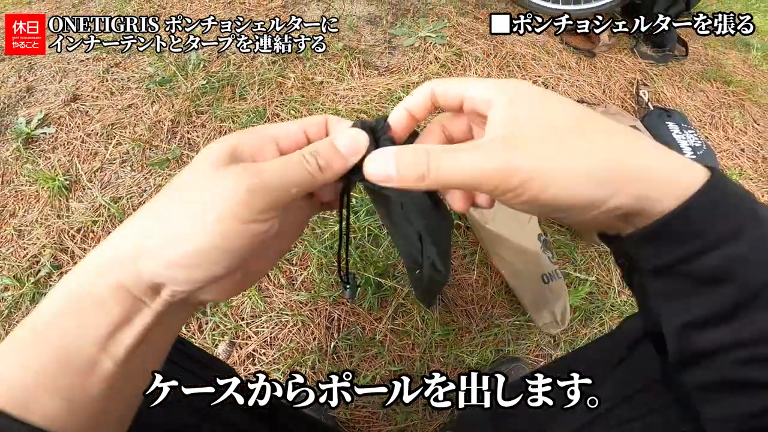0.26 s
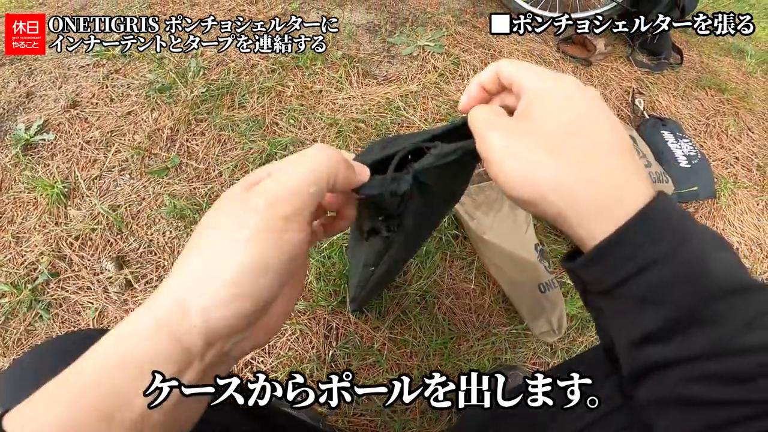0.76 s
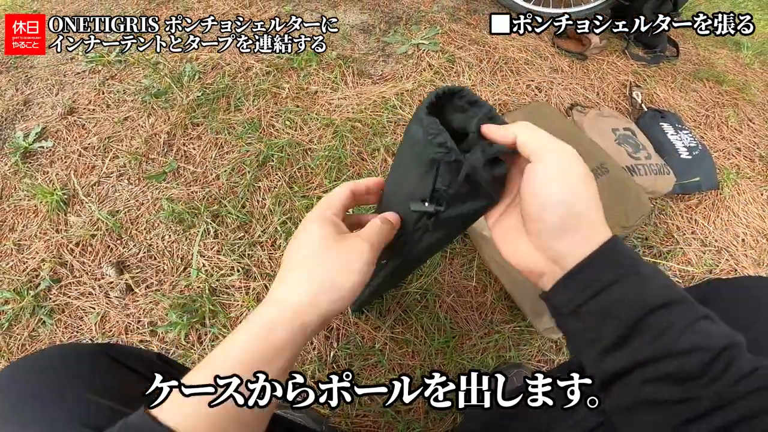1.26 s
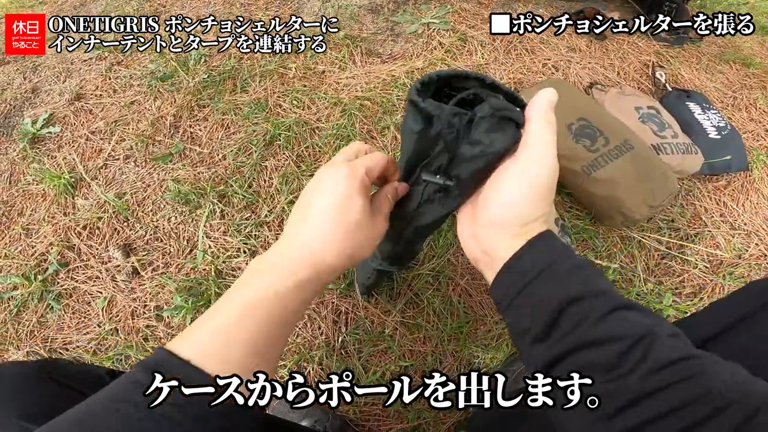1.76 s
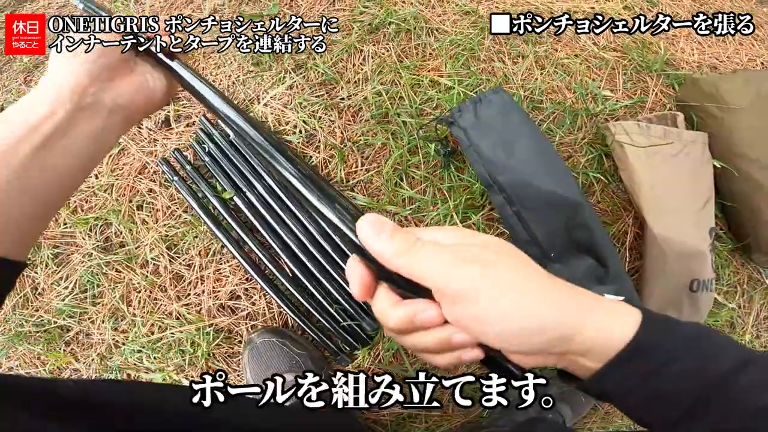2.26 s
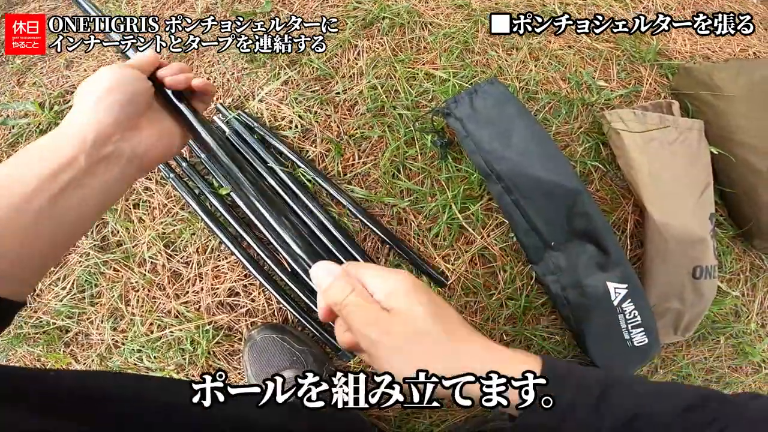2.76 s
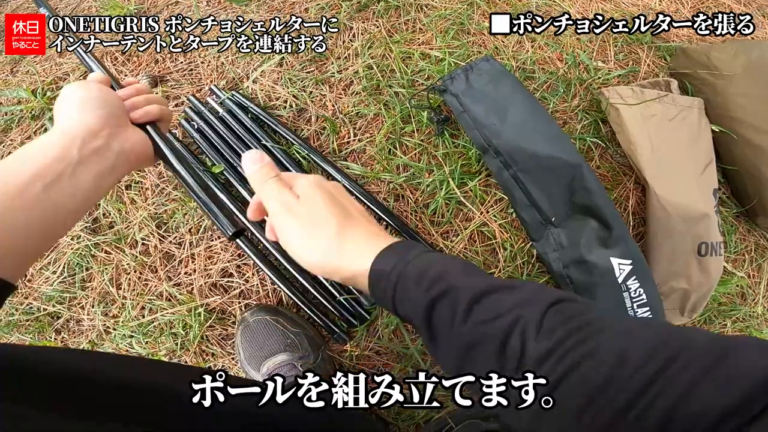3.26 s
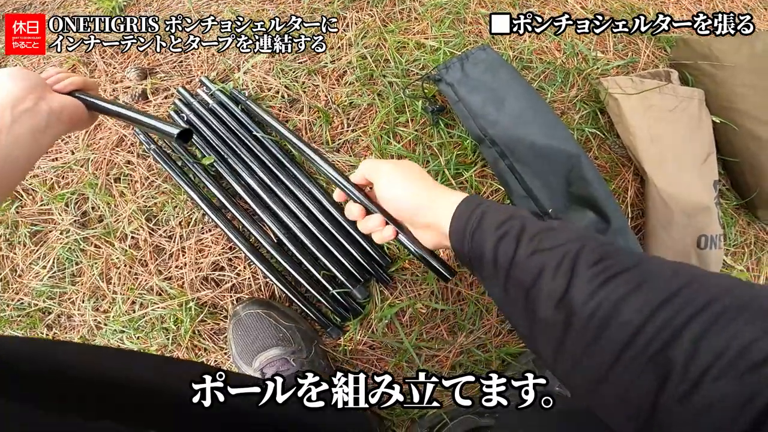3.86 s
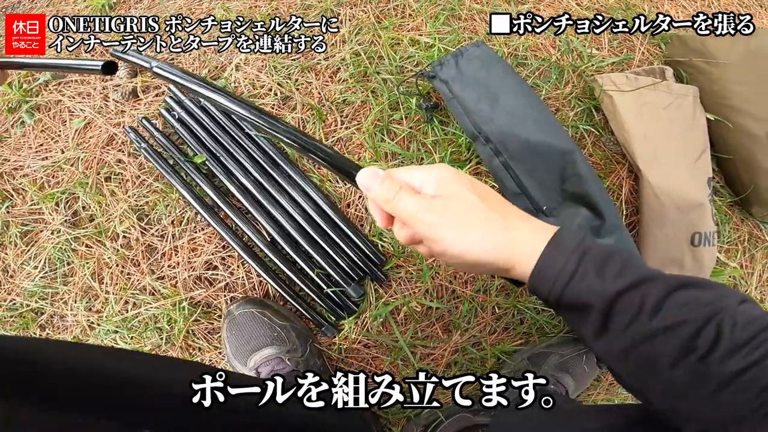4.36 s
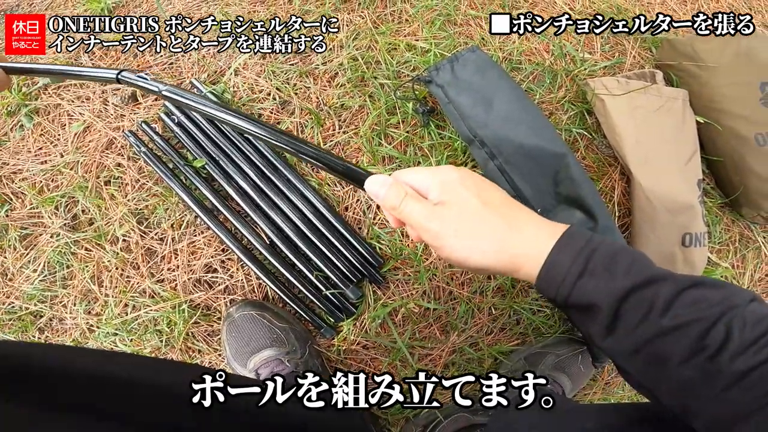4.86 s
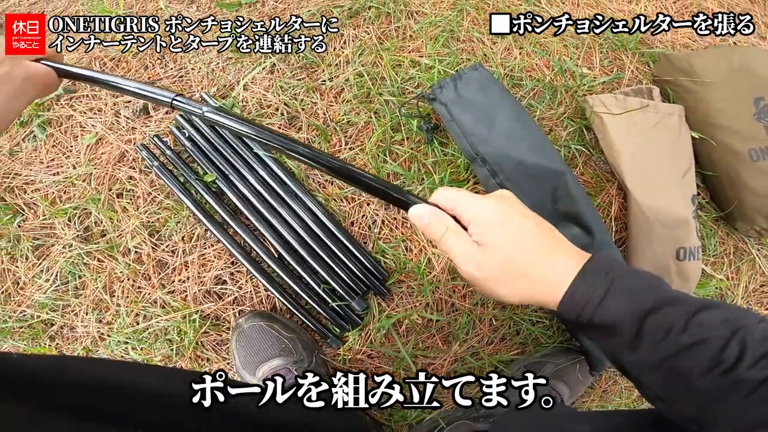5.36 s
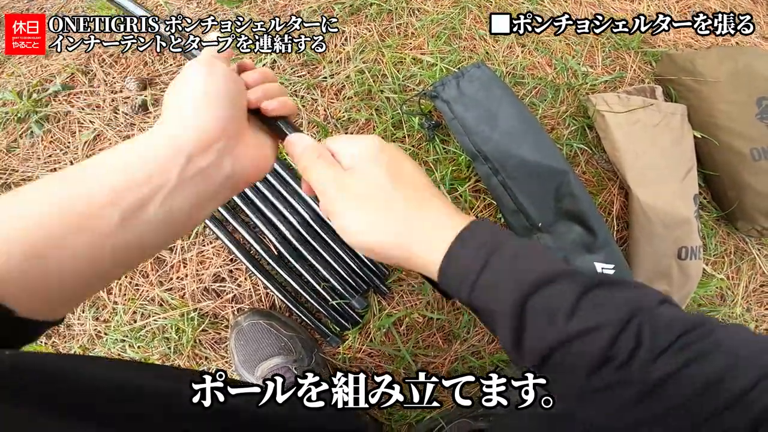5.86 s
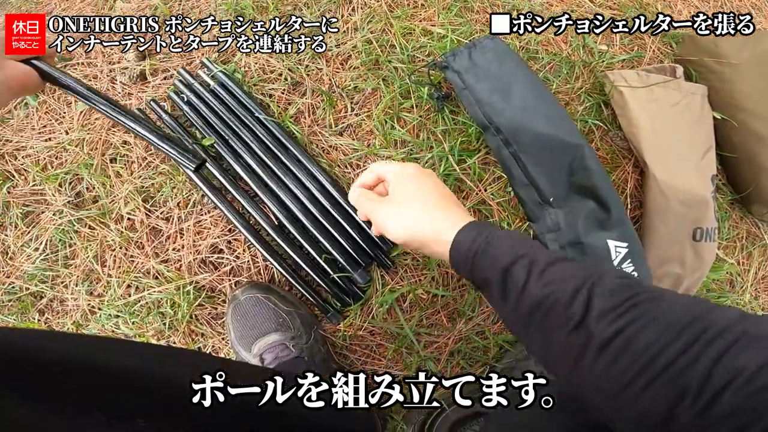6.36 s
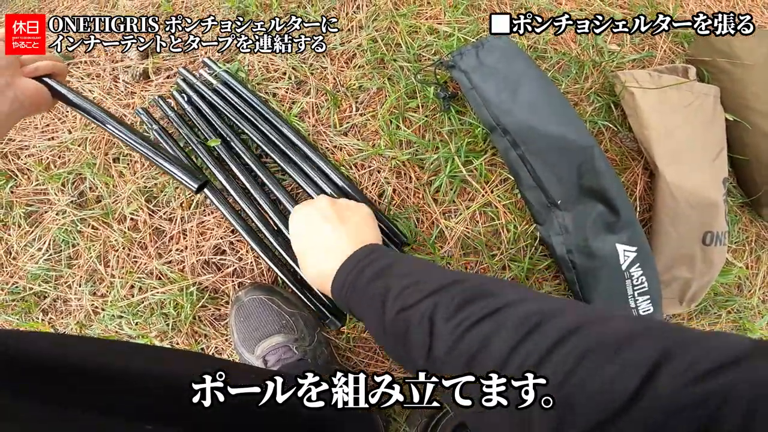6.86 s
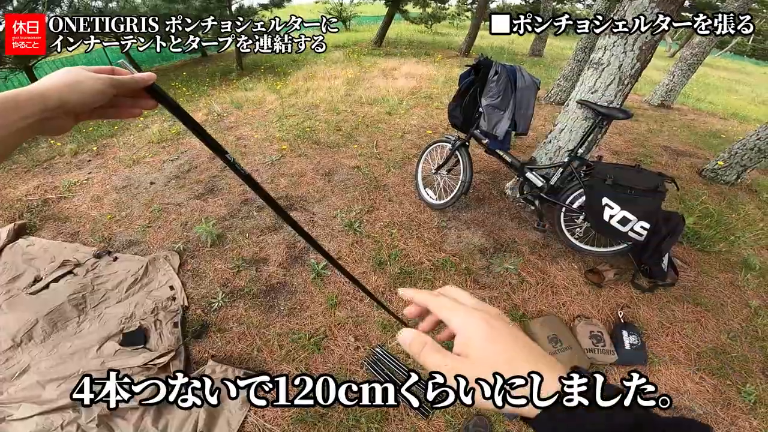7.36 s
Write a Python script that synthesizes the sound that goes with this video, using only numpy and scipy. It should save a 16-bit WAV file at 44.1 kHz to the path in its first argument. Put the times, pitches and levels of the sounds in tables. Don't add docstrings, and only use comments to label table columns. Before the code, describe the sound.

Close, bright clinking of hollow pole sections in a cloth bag, two crisp joint connections amid chirping birds, a heap rattle, then an engine passing.

```python
import sys
import numpy as np
from scipy import signal
from scipy.fft import rfft, irfft, next_fast_len
from scipy.io import wavfile
from scipy.ndimage import uniform_filter1d, map_coordinates

SR = 44100
rng = np.random.default_rng(int(sys.argv[2]) if len(sys.argv) > 2 else 0)


def undo_db(level):
    steps = np.asarray(level, float) / 20
    return 10 ** steps


def waveform_to_disk(signal):
    frames = np.transpose(np.atleast_2d(signal))
    scaled = np.clip(frames, -1, 1) * 32767
    samples = np.round(scaled).astype(np.int16)
    wavfile.write(sys.argv[1], SR, samples)


N = 335601

# start_s, fade_in_s, cut_s
SHOTS = [
    (0, .002, 2.1405),
    (2.335, .09, 7.1225),
    (7.318, .09, 7.7),
]
HEAP_SHOT_S, ENGINE_SHOT_S = SHOTS[1][0], SHOTS[2][0]


def unit(x):
    return x / np.sqrt(np.mean(x ** 2) + 1e-20)


def along(points, hz):
    f, v = np.transpose(points)
    return np.interp(np.log(hz + 1), np.log(f + 1), v)


def wobble(rate):
    knots = rng.standard_normal(int(N * rate / SR) + 4)
    return map_coordinates(knots, [np.arange(N) * rate / SR])


def filtered(x, response):
    m = next_fast_len(N + 8192)
    return irfft(rfft(x, m) * response(np.fft.rfftfreq(m, 1 / SR)), m)[..., :N]


def resonate(x, hz, width_hz):
    pole = np.exp((2j * hz - abs(width_hz)) * np.pi / SR)
    wave = signal.lfilter([1], [1, -pole], x)
    return wave / np.abs(wave).max()


def grit(count, spike):
    strength = np.exp(spike * rng.standard_normal(count // 24 + 1))
    return unit(rng.standard_normal(count) * strength.repeat(24)[:count])


def add(track, s, sound):
    i = round(s * SR)
    track[..., i:i + sound.shape[-1]] += sound[..., :track.shape[-1] - i]


def by_shot(tables):
    t = np.arange(N) / SR
    shot = np.searchsorted([start for start, *_ in SHOTS], t, side="right") - 1
    curves = []
    for k in range(1, len(tables[0][0])):
        each = [np.interp(t, np.array(rows)[:, 0], np.array(rows)[:, k]) for rows in tables]
        curves.append(np.choose(shot, each))
    return curves


# frequency_hz, width_hz, level_db
TUBE = [(670, 37, -31), (1839.3, 44, -6.5), (2500, 49, -17), (3506, 58, -8.5), (4100, 130, -19.5),
        (4800, 66, -26.5), (5502, 59, -12), (6600, 120, -30), (6840, 27, -21), (7740, 31, -22),
        (8240, 32, -25), (9160, 33, -28.5), (10320, 76, -29.5), (12070, 110, -30.5)]
# frequency_hz, level_db (per Hz)
RATTLE = [(300, -41.5), (1000, -8), (2000, 2.5), (3600, -5.5), (6000, -12), (9000, -13), (15500, -43)]


def clatter():
    out, edge = np.zeros((2, N)), np.zeros(N)
    for s, db, *strengths in knocks():
        in_bag = s < HEAP_SHOT_S
        t = np.arange(SR // 12 if in_bag else SR // 6) / SR
        decay = undo_db(-60 * (t / (.036 if in_bag else .09)) ** 1.11)
        chatter = grit(len(t), 0.69) * decay * (1 - np.exp(-t / 0.0026))
        blow = chatter + 9 * (np.arange(len(t)) == 4)

        highest = strengths[-1] / 2 + (0 if in_bag else -7)
        levels = np.add(strengths + [highest], [1.3, 12, 5.1, 5, 4.3])
        struck = list(zip([1680, 2360, 3285, 6000, 12000], levels))
        struck.insert(3, (4190, levels[2] + (1 if in_bag else -12)))

        damping = (1.6 if s > 1.8 else .8) if in_bag else .3
        apart = .018 if in_bag else .006
        for hz, width, level in TUBE:
            detune, split, vary, place, sign = rng.standard_normal(5)
            pair = resonate(blow, hz * (1 + 0.0048 * detune), damping * width)
            pair += .7 * resonate(chatter, hz * (1 + apart * split), 1.5 * damping * width)
            if hz < 6000:
                pair += undo_db(-10.5) * resonate(blow, hz * (1 - apart / 3 * split), .35 * damping * width)
            spread_db = 1.2 if hz < 4000 else 3.5
            pair *= undo_db(db + level + along(struck, hz) + spread_db * vary) * np.sign(sign)
            side = 0.24 * (hz / 3000) ** .45 * place * pair.real
            add(out, s, np.array([pair.imag, side]))

        crack = undo_db(db - 8.5 - 60 * t / 0.0064) * rng.standard_normal(len(t))
        add(edge, s, undo_db(db - 9.0) * chatter + crack)
    middle = out[0] + filtered(edge, lambda f: undo_db(along(RATTLE, f)))
    return np.array([middle + out[1], middle - out[1]])


# start_s, peak_db, lean_db (from the 1.8 to the 3.5 kHz mode), middle_db (2.5 kHz mode)
BAG = [(0.065, -33, 2.5, -5.5), (0.076, -20.5, 2.5, -20), (0.0919, -21.5, 0.5, -10),
       (0.1047, -15.5, -0.5, -11.5), (0.2131, -32, -9.5, -32.5), (0.2934, -34, 3.5, -14),
       (0.3232, -21, 1, -21), (0.499, -20, 1, -17.5), (0.604, -30.5, 1.5, -17.5), (0.684, -12.5, -7, -10.5),
       (0.6916, -11, 7, -11), (0.7059, -12, 0.5, -11), (0.72, -20.5, -3, -13), (0.7766, -38.5, -3, -17.5),
       (0.7887, -14, -5.5, -24), (.799, -17, -1, -15), (0.815, -21, 3.5, -21), (0.8311, -7, -1, -28.5),
       (.841, -12, 2, -21.5), (0.8504, -11, 3, -24.5), (0.8776, -16, -1, -14), (0.9541, -12.5, 1, -11.5),
       (.974, -23.5, -3.5, -23.5), (1.026, -23, 3, -23), (1.0666, -22, -0.5, -12), (1.0816, -16, 1.5, -9),
       (1.099, -22, 3, -10), (1.3554, -18, 1, -30), (1.36, -26, -4.5, -14.5), (1.4597, -17, 0, -16),
       (1.481, -11, 2, -24), (1.4875, -10.5, 2.5, -23.5), (1.543, -22, 4, -17.5), (1.5487, -14.5, 4, -11),
       (1.5593, -14, 7, -20), (1.5719, -7.5, 2, -18), (1.576, -12.5, 0.5, -14), (1.583, -11.5, -0.5, -15.5),
       (1.5904, -15.5, 4, -22.5), (1.86, -11, 8, -25), (1.8744, -12, 7.5, -20), (1.8831, -4, 2, -25)]
# (modes near 1.8, 3.5 and 5.5 kHz)
HEAP = [(2.811, -41, -19, -6, -36), (3.5796, -48, -26, -23, -7.5), (3.652, -42, -31, -12, 1.5),
        (3.6684, -38.5, -15, -25, -12), (3.764, -32, -26, -21, -16), (3.7884, -30, -16, -36, -16),
        (3.817, -41, -26, -26, -17), (6.706, -47.5, 0, -15, -18.5), (6.732, -45.5, -2, -10, -14),
        (6.7229, -35.5, 1, -18, -9), (6.758, -39, -1, -23, -12.5), (6.8717, -27, -4, -13, -7.5),
        (6.8995, -29.5, -3, -16, -33), (6.9188, -29.5, -6, -13, -14), (6.803, -47, -7, -18, -12),
        (6.937, -29, -5, -21, -17), (6.946, -32.5, -8, -30, -16), (7.03, -46, -7, -21, -10),
        (7.0681, -38, -3, -18.5, -22.5), (7.0103, -40.5, 1, -31, -5), (7.0821, -25, -32, -7.5, -21),
        (7.089, -16.5, -13.5, -1, -9.5), (7.1065, -15, -8.5, -6.5, -18), (7.1153, -19.5, -19.5, -0.5, -17)]


def knocks():
    rows = []
    for s, db, lean, middle in BAG:
        top = -24 + .4 * (db + 14.0)
        rows.append((s, db, -9 - lean, middle, -10 + lean, top))

    free = np.diff([row[0] for row in rows] + [np.inf]) > .03
    rebounds = [(s + 0.0062, db - 15.5, *np.add(modes, 6.5))
                for (s, db, *modes), alone in zip(rows, free) if alone]

    heap = [(s, db, low, -29, main, top) for s, db, low, main, top in HEAP]
    return rows + rebounds + heap


# start_s, peak_db, pitch_hz (strongest mode),
# brightness_db
TICKS = [(.916, -15, 1173, -30.5), (0.939, -12.5, 1530, -39), (1.465, -19, 3950, -35),
         (1.609, -18.5, 4110, -30.5), (1.6299, -10, 1430, -35), (2.805, -31, 5550, -32),
         (3.785, -50, 2300, -15), (4.642, -53, 6860, -19), (5.034, -32.5, 3450, -50),
         (5.2464, -34, 3480, -40), (5.577, -19, 3880, -45), (5.778, -40, 4200, -33.5),
         (1.2281, -34, 3910, -25.5), (1.4186, -30.5, 3840, -32.5), (1.673, -18, 1500, -31),
         (1.8076, -21.5, 1129, -38), (1.93, -14.5, 3640, -29.5), (2.3781, -17, 1810, -27),
         (2.386, -4.5, 2550, -32), (2.3909, 0, 3110, -36.5), (2.677, -10, 3870, -40),
         (2.6845, -4.5, 5330, -43.5), (4.8743, -17.5, 1600, -47), (4.9988, -35, 3460, -43),
         (5.0188, -20, 3420, -29), (5.017, -18.5, 1130, -48), (5.0572, -29.5, 3500, -25),
         (5.2214, -27.5, 2760, -49), (5.2413, -24, 7300, -17), (5.2556, -5.5, 3330, -18.5),
         (5.3141, -18.5, 2630, -60), (5.5475, -26, 5100, -26), (5.5684, -18, 4750, -26),
         (5.6367, -15.5, 3460, -12.5), (5.6392, -4, 3600, -24.5), (6.034, -35, 3430, -33.5),
         (.2658, -33, 1830, -33), (0.3709, -23.5, 1750, -29), (0.4308, -25.5, 1750, -31),
         (.5826, -22.5, 1200, -32.5), (.643, -22, 900, -40), (0.6864, -12, 4300, -30.5),
         (1.0251, -22.5, 1500, -24.5), (1.1648, -30, 1900, -33), (1.2855, -32, 1902, -31),
         (2.0328, -24, 1210, -33), (2.1326, -17.5, 1110, -35), (5.757, -53, 3300, -35),
         (7.0889, -16.5, 1520, -27), (6.792, -27, 1830, -26.5)]
# frequency_hz, width_hz, level_db
GRIPPED = [(1590, 100, -3.5), (2790, 130, -9.5), (3450, 250, -4.5), (4000, 190, -11.5), (4870, 150, -14),
           (5800, 250, -11), (7300, 160, -18)]


def ticks():
    raw, bright = np.zeros((2, N))
    t = np.arange(SR // 12) / SR
    for s, db, hz, bright_db in TICKS:
        decay = undo_db(-60 * t / .012) + .04 * undo_db(-60 * t / .09)
        crack = grit(len(t), .3) * decay * (1 - np.exp(-t / 0.0011))
        body = resonate(crack, hz, 380).imag
        for f, width, level in GRIPPED:
            body = body + undo_db(level - 8.0 + 0.68 * rng.normal()) * resonate(crack, f, width).imag
        add(raw, s, undo_db(db) * (0.11 * crack + body))
        add(bright, s, undo_db(db + bright_db + 8.0) * crack)
    return contact(raw, bright)


# start_s, seated_s, level_db, whistle_db, ring_db
SLIDES = [
    (2.352, 2.394, -31, -10.5, -49),
    (2.639, 2.688, -26, -10.5, -16),
    (5.219, 5.263, -38.5, 0.5, -54),
    (5.607, 5.642, -23, 2, -36),
]
# first_hz, seated_hz
SOCKET_HZ = [(2500, 3600), (2700, 6700)]
# frequency_hz, width_hz, level_db
JOINED = [(1914, 43, -5.5), (3780, 42, -7.5), (5300, 200, 4), (6650, 110, -3.5), (7050, 110, -7.5),
          (8640, 100, -15), (10700, 160, -24)]


def slides():
    raw, bright, ring = np.zeros((3, N))
    for start, seated, db, whistle_db, ring_db in SLIDES:
        u = np.arange(0, 1.8, 1 / (SR * (seated - start)))
        scrape = grit(len(u), .15)
        for first, last in SOCKET_HZ:
            hz = first + (last - first) * np.minimum(u, 1) ** 1.4
            rising = np.sin(2 * np.pi * np.cumsum(hz) / SR)
            scrape = scrape + undo_db(whistle_db) * unit(resonate(scrape, 0, 740).real * rising)
        growth_db = 30 * np.maximum(1 - u, 0) ** 1.8
        stop_db = 13.5 + 899 * (seated - start) * (u - 1)
        scrape = scrape * undo_db(-np.where(u < 1, growth_db, stop_db))
        add(raw, start, undo_db(db + 7.0) * scrape)
        add(bright, start, undo_db(db - 24) * scrape)
        drive = scrape * np.minimum(u, 1) ** 2.5
        for hz, width, level in JOINED:
            add(ring, start, undo_db(ring_db + level) * resonate(drive, hz, width).imag)
    return contact(raw, bright) + filtered(ring, lambda hz: 1 / (1 + (hz / 10500) ** 6))


# frequency_hz, level_db (per Hz)
TAP = [(300, -25), (1000, -21.5), (1800, -15.5), (3300, -7), (5300, -9), (7000, -8.5), (9000, -17.5),
       (12000, -39.5)]


def contact(raw, bright):
    edge = [(5000, -34.5), (8000, -0.5), (12000, -4), (15500, -27.0)]
    return filtered(raw, lambda hz: undo_db(along(TAP, hz))) + filtered(bright, lambda hz: undo_db(along(edge, hz)))


# (frequency_hz, level_db, t60_s)
RINGS = [(.8315, -19, [(5550, -1, .08), (4230, -4, .1), (6850, -14, .12)]), (.956, -34, [(3500, 0, .2)]),
         (1.8758, -25, [(5500, 0, .05), (7650, -2, .06), (1560, -3, .06)]), (1.4815, -29, [(7750, 0, .05),
         (4300, 0, .06)]), (1.082, -30, [(4250, 0, .07)]), (.955, -43, [(678, 7.5, 0.16)]),
         (1.573, -24, [(1550, -7, .07), (2170, -4, .09), (2910, -4, .06), (3960, -8, .15)]),
         (.09, -33, [(2080, 0, .12)]), (1.067, -30, [(2000, 0, .1)]), (.879, -30, [(4100, 0, .06),
         (2450, 0, .06)]), (1.883, -19, [(1500, -2, .05), (2150, -2, .05), (2500, -4, .04)]),
         (.688, -24, [(5600, 0, .05), (2480, 0, .12)]), (.707, -26, [(5500, 0, .08)]),
         (2.392, -37.5, [(1750, 8.5, 0.049), (6680, -18, .3)]), (2.687, -22, [(126.1, 4, 0.25),
          (376, -10.5, 0.34), (650, -21, 0.19), (880, -19, 0.19), (1193, -20.5, 0.13), (1823, -20, 0.67),
          (6730, -30, 0.14)]), (3.785, -25, [(1522, -17, 0.1)]), (4.877, -44, [(1800, -2, 0.096),
          (660, 2.5, 0.036), (5170, -14, .06)]), (5.256, -44, [(1843, -14, 0.18), (3670, -1.5, 0.075)]),
          (5.639, -27.5, [(80.6, 10, 0.048), (242, -4, 0.16), (425, -12.5, 0.15), (1390, -18, .12),
          (4210, 2, 0.052), (6650, -13.5, 0.17), (10600, -30, .1)]), (5.68, -52, [(1880, -2.5, 0.46)]),
          (.688, -39, [(5600, -3.5, .05), (2500, 1, 0.16)]), (.707, -44, [(5500, -1.5, 0.057)]),
          (5.019, -53, [(700, -3, 0.065)]), (6.903, -45, [(1481, 4, 0.19)]),
          (6.928, -40.5, [(1536, 3, 0.11), (2457, 5.5, 0.089), (4250, -5.5, 0.13)]),
          (2.393, -40, [(2640, -2, 0.056), (3350, -2.5, .06)]), (6.916, -45, [(1501, 0, 0.23),
          (2437, 5, 0.087)])]


def rings():
    out, t = np.zeros(N), np.arange(SR // 2) / SR
    for s, db, modes in RINGS:
        for hz, level, t60 in modes:
            add(out, s, undo_db(db + level - 60 * t / t60) * np.sin(2 * np.pi * hz * t))
    return out


# frequency_hz, level_db (per Hz)
RUSTLE = [(180, -30.5), (300, 0), (861, -5), (1850, -1.5), (2970, -7.5), (7000, -17.5), (9100, -37),
          (15400, -120)]
CRISP = [(2060, -21), (3500, -6.5), (5920, -11), (9770, -23.5), (12500, -26.5), (14200, -33),
         (15600, -53.5)]


def cloth():
    rustle_db, crisp_db = moves()
    rustle = undo_db(rustle_db - 1) * rush(RUSTLE, spike=0.31, flutter_db=3.0)
    return rustle + undo_db(crisp_db + 11.0) * rush(CRISP, spike=.35, flutter_db=1.3)


# peak_s, rustle_db, crispness_db
CLOTH = [(.1, -36, -62), (.4, -41.5, -61), (.51, -41, -59.5), (0.6, -42, -59.5), (0.65, -37.5, -56.5),
         (.3, -47.5, -74), (.86, -40.5, -59), (1.02, -45, -63.5), (1.42, -45.5, -63.5), (1.599, -41, -58),
         (1.841, -41, -60.5), (2.0, -47.5, -61.5), (2.135, -42.5, -60), (2.45, -58, -82), (2.62, -57, -78),
         (2.931, -50, -68), (3.25, -57.5, -67), (3.62, -69, -73), (4.38, -70.5, -78), (4.9, -60.5, -101),
         (5.271, -56.5, -83), (5.531, -64, -74.5), (5.67, -64, -72), (5.82, -82.5, -79),
         (5.875, -82, -66.5), (5.95, -63.5, -67), (6.04, -67.5, -75.5), (1.23, -52.5, -72.5),
         (4.68, -71, -97.5), (6.93, -58.5, -72), (7.101, -67, -70)]
# start_s, rustle_db, crispness_db
RESTING = [
    [(0, -52, -75.5)],
    [(2.4, -74, -93.5)],
    [(7.47, -53, -91)],
]


def moves():
    crest_s = 0.014
    t = np.arange(0, N / SR, .002)
    away = np.hypot(t - np.array(CLOTH)[:, :1], crest_s) - crest_s
    levels = []
    peaks = np.transpose(CLOTH)[1:]
    for peak, db_per_s, rest in zip(peaks, (113.5, 150), by_shot(RESTING)):
        power = undo_db(2 * (peak[:, None] - db_per_s * away)).sum(axis=0)
        levels.append(10 * np.log10(undo_db(2 * rest) + np.interp(np.arange(N) / SR, t, power)))
    return levels


# frequency_hz, likeness (1 = mono)
ALIKE = [(60, .9993), (150, 1), (330, 1), (700, .985), (1410, 1), (3100, 0.98), (6820, 0.95), (15000, 1)]


def rush(spectrum, spike, flutter_db):
    flutter = undo_db(flutter_db * (wobble(20) + wobble(45)))
    pair = np.array([grit(N, spike), grit(N, spike)]) * flutter

    def mid_side(hz):
        turn = np.arccos(np.clip(along(ALIKE, hz), -1, .9998)) / 2
        return undo_db(along(spectrum, hz)) * [np.cos(turn), np.sin(turn)]

    mid, side = filtered(pair, mid_side)
    return unit(np.array([mid + side, mid - side]))


# frequency_hz, level_db (per Hz)
ENGINE = [(71, -26.5), (120, -1.5), (212, -11), (260, -1.5), (402, -16), (576, -7.5), (857, -12),
          (1320, -22.5), (2250, -24), (5070, -36.5), (11000, -72), (22000, -120)]


def engine():
    turn = 2 * np.pi * 50.3 * np.arange(N) / SR + .3 * wobble(8) + 0.77
    roar = rush(ENGINE, spike=0.029, flutter_db=0.8) * (1 + 0.079 * np.sin(turn))
    return (undo_db(-24.0) * np.sin(turn) + undo_db(-33.5) * roar) * (np.arange(N) > ENGINE_SHOT_S * SR)


# start_s, length_s, first_hz, last_hz, level_db
NOTES = [(1.099, 0.32, 1395, 1166, -55.5), (3.271, 0.019, 4220, 4570, -61),
         (4.228, 0.083, 6000, 6140, -72.5), (5.145, 0.013, 4100, 4000, -68), (5.129, 0.02, 4850, 4380, -65),
         (2.956, 0.051, 4600, 3700, -56.5), (3.078, 0.032, 3320, 4000, -54.5),
         (3.285, 0.084, 3460, 4140, -57.5), (3.403, 0.025, 6500, 5250, -57),
         (3.452, 0.015, 5900, 5350, -53.5), (3.671, 0.086, 3920, 5290, -55),
         (3.769, 0.067, 5480, 5440, -63), (3.751, 0.1, 3630, 3420, -61), (3.946, 0.15, 4150, 3760, -63),
         (4.09, 0.069, 6200, 6240, -65), (4.13, 0.014, 5350, 4850, -55), (4.252, 0.033, 4800, 5280, -63),
         (4.335, 0.066, 3940, 2550, -62.5), (4.402, 0.073, 2520, 3620, -67),
         (6.424, .012, 3780, 3570, -67.5), (3.532, 0.033, 9100, 8000, -72), (3.562, .03, 9000, 8000, -72),
         (6.368, 0.046, 3590, 3860, -69.5), (6.409, 0.02, 3800, 3940, -65.5)]
# start_s, length_s, level_db
WHEEZES = [
    (1.636, 0.25, -47.5),
    (3.01, 0.58, -60),
    (3.815, 0.58, -58.5),
    (6.449, 0.68, -59.5),
]
# start_s, spacing_s, chirp_s, first_hz, last_hz
TRILL = (3.82, .0268, .016, 4050, 3050)
PEEPS = (4.518, .0735, .024, 4850, 4200)


def birds():
    song, wheeze, trill = np.zeros((3, N))
    for start, length, first, last, db in NOTES:
        early = .72
        glide = lambda u: first + (last - first) * (u + (4 * early - 2) * u * (1 - u))
        add(song, start, whistle(length, glide, db))
    for start, length, db in WHEEZES:
        sag = lambda u: 4250 + (4850 - 4250) * np.exp(-u * length / 0.11)
        add(wheeze, start, whistle(length, sag, db, swing_hz=190, buzz_hz=228, onset=0.35))
    chirps(trill, TRILL, count=8, db=-52.5, drop_hz=20)
    chirps(song, PEEPS, count=7, db=-74, drop_hz=0)
    song = song * undo_db(4 * wobble(150)) + wheeze * (.9 + .35 * wobble(300))
    return song + trill + undo_db(-5.5) * grove(song + 0.15 * trill)


def chirps(track, series, count, db, drop_hz):
    start, spacing, length, first, last = series
    for k in range(count):
        add(track, start + k * spacing, whistle(length, lambda u: first + (last - first) * u - drop_hz * k, db))


def whistle(length, glide, db, swing_hz=0, buzz_hz=0, onset=0.59):
    u = np.arange(0, 1, 1 / (SR * max(length, .004)))
    hz = glide(u) + swing_hz * np.sin(2 * np.pi * buzz_hz * u * length)
    unsteady = unit(uniform_filter1d(rng.standard_normal(len(u)), size=60))
    hz = hz + 50 * (glide(u) / 4000) ** 2 * unsteady
    swell = np.sin(np.pi * u ** onset) ** .6
    return undo_db(db) * np.sqrt(2) * swell * np.sin(2 * np.pi * np.cumsum(hz) / SR)


# frequency_hz, t60_s
GROVE = [(300, 0.2), (4000, .6), (12000, 0.054)]


def grove(x):
    hz, t, z = signal.stft(rng.standard_normal((2, SR // 2)), SR, nperseg=256)
    tail = signal.istft(z * undo_db(-60 * t / along(GROVE, hz)[:, None]), SR, nperseg=256)[1]
    tail = tail[0] + 0.2 * np.array([tail[1], -tail[1]])
    return signal.fftconvolve(x[None], tail / np.linalg.norm(tail[0]), axes=1)[:, :N]


# start_s, deep_db, upper_db
TRAFFIC = [
    [(0.0, -28, -50), (0.02, -52.5, -40.5), (2.04, -48.5, -41)],
    [(2.52, -38.5, -35.5), (3.59, -44, -40.5), (6.15, -37, -43.5), (7.0, -44.5, -44.5)],
    [(7.47, -36.5, -40.5), (7.6, -46, -34)],
]
# frequency_hz, level_db (per Hz)
RUMBLE = [(13, -34.5), (33, -3.5), (54, -2.5), (134, -9), (250, -15.5), (335, -27), (416, -27), (539, -47),
          (910, -68), (1540, -120)]
# frequency_hz, level_db (per Hz)
FAR = [(290, -36), (500, -3.5), (831, -25), (1330, -11), (2380, -22.5), (3630, -18), (5970, -25),
       (9000, -40.5), (13000, -120)]


def traffic():
    deep_db, upper_db = by_shot(TRAFFIC)
    rumble = rush(RUMBLE, spike=0, flutter_db=1.27)
    deep = filtered(rumble, lambda hz: 1 / (1 + (hz / 60) ** 6))
    hush = undo_db(-69.5) * rush(FAR, spike=0, flutter_db=2.0)
    return undo_db(deep_db) * unit(deep) + undo_db(upper_db) * unit(rumble - deep) + hush


def scene():
    joined = ticks() + slides() + rings()
    late = np.diff(joined, prepend=0)
    shade = .12 * np.diff(late, append=0)
    late = late * (.3 + .06 * wobble(5.4)) + shade
    poles = clatter() + joined + np.array([late, -late])
    return poles + undo_db(-41.0) * grove(poles[0]) + cloth() + engine() + birds() + traffic()


def roll_off(x):
    return signal.sosfilt(signal.butter(12, 15720, fs=SR, output="sos"), x)


def record(dry):
    t = np.arange(N) / SR
    gain = sum(np.clip((t - start) / fade, 0, 1) ** 1.32 * (t < cut) for start, fade, cut in SHOTS)
    mix = filtered(dry, lambda hz: hz < 15720) * gain
    return roll_off(mix)


dry = scene()
out = record(dry)
waveform_to_disk(out)
```